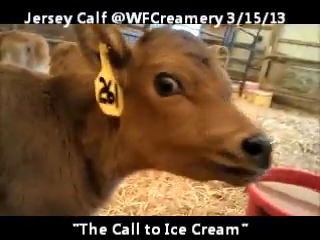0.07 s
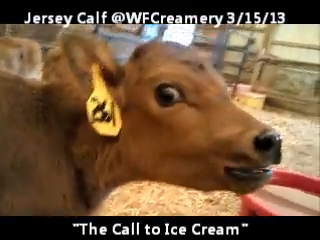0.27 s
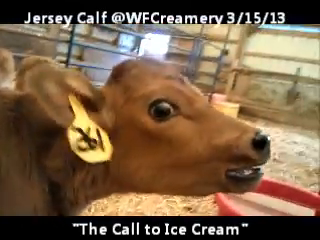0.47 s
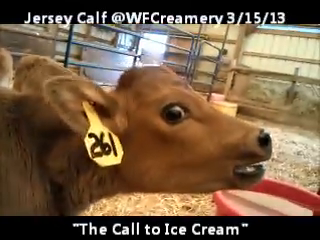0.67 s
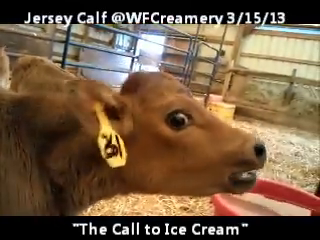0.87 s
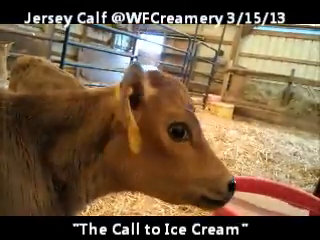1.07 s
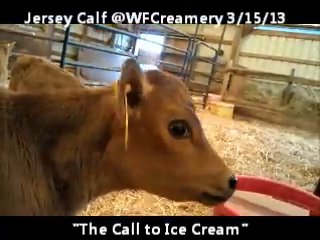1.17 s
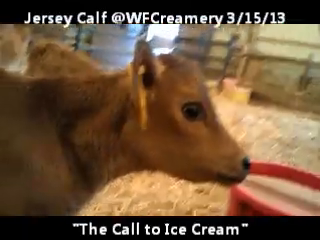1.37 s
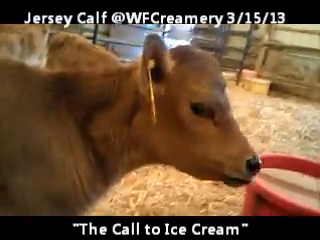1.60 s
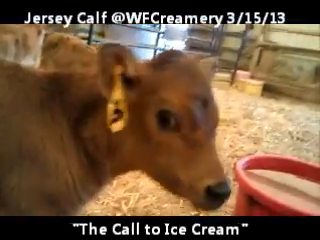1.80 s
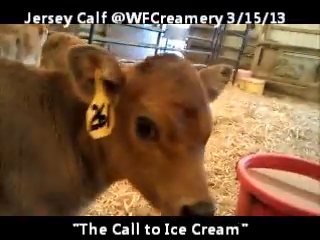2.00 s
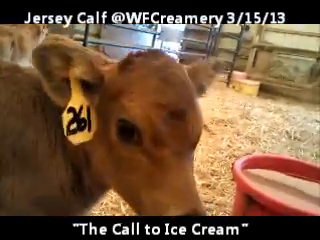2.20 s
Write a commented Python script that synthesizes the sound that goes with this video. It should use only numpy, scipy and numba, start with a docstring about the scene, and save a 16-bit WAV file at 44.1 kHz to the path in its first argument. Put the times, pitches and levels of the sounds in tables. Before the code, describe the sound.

A calf bawls once, very close to the microphone, starting as a rising nasal hum and opening into a loud, slightly distorted call. The barn echoes briefly, then the calf smacks its mouth and sniffs softly.

```python
"""Calf bawling in a barn

One calf, close to the microphone. Its vocal folds drive a rising hum through the nose, then the lips
part into a loud open call that overloads the microphone and sags at the end. The barn rings briefly.
Over quiet room tone the calf smacks its mouth, and sniffs and snuffles at the microphone in short puffs."""
import sys
import numpy as np
from scipy import signal
from scipy.fft import rfft, irfft
from scipy.io import wavfile
from scipy.ndimage import uniform_filter1d
from numba import njit

SR = 44100
rng = np.random.default_rng(int(sys.argv[2]) if len(sys.argv) > 2 else 0)


def dump_mix(stems):
    """Bounce the given channels to the path in sys.argv[1] as a 16-bit WAV at rate SR."""
    frames = np.atleast_2d(stems).T  # one column per channel
    limited = np.clip(frames, -1, 1)  # hard clip at full scale
    pcm = np.round(limited * 32767).astype(np.int16)
    wavfile.write(sys.argv[1], SR, pcm)


N = 99225
T = np.arange(N) / SR


def undb(db):
    """Decibels to gain."""
    return 10 ** (np.asarray(db) / 20)


def curve(rows):
    """Straight lines between (time [s], value) points."""
    return np.interp(T, *np.array(rows).T)


def fader(rows):
    """Gain from (time [s], level [dB]) points, silent outside them."""
    return undb(curve(rows)) * (T >= rows[0][0]) * (T < rows[-1][0])


def wander(rate_hz):
    """Smooth random drift with a spread near 1."""
    hold = int(SR / rate_hz)
    steps = np.repeat(rng.standard_normal(N // hold + 1), hold)
    return 1.5 * uniform_filter1d(uniform_filter1d(steps, hold), hold)[:N]


def spectrum(colour, size):
    """Gain of each FFT bin from (frequency [Hz], level [dB]) points."""
    hz, db = np.array(colour).T
    bins_hz = np.fft.rfftfreq(size, 1 / SR) + 1
    return undb(np.interp(np.log(bins_hz), np.log(hz), db))


def noise(colour):
    """Coloured noise of rms 1."""
    y = irfft(rfft(rng.standard_normal(N)) * spectrum(colour, N), N)
    return y / y.std()


@njit
def svf(x, hz, width):
    """State-variable filter with a moving centre: band-pass and low-pass."""
    y, band, low = np.empty((2, len(x))), 0., 0.
    for i in range(len(x)):
        g, damping = np.tan(np.pi * hz[i] / SR), width[i] / hz[i]
        v = (band + g * (x[i] + 1e-18 - low)) / (1 + g * (g + damping))
        y[0, i], y[1, i] = damping * v, low + g * v
        band, low = 2 * v - band, low + 2 * g * v
    return y


def ring(x, hz, width):
    """One resonance, gain 1 at its centre."""
    return svf(x, hz * np.ones(N), width * np.ones(N))[0]


def high_cut(x, hz):
    """Steep low-pass whose edge can move."""
    hz = hz * np.ones(N)
    return svf(svf(x, hz, 2 * hz)[1], hz, hz / np.sqrt(2))[1]


def low_cut(x, hz):
    """Two-pole high-pass."""
    return signal.sosfilt(signal.butter(2, hz, "highpass", fs=SR, output="sos"), x)


def cavity(x, colour, size=2048):
    """Causal, minimum-phase ringing of a cavity with the given colour."""
    cepstrum = irfft(np.log(spectrum(colour, size)))
    cepstrum[1:size // 2] *= 2
    cepstrum[size // 2 + 1:] = 0
    return signal.fftconvolve(x, irfft(np.exp(rfft(cepstrum))))[:N]


def vocal_folds(jitter=.00064, shimmer_db=.135, air_decay_cycles=.9):
    """Each cycle of the folds gives a sharp pulse and a fading puff of air."""
    # pitch of the folds (time [s], frequency [Hz])
    pitch = [(0, 128.5), (.06, 144.7), (.084, 150.1), (.142, 158.3), (.25, 170.6), (.33, 172.7),
             (.408, 175.9), (.516, 177.4), (.63, 177.7), (.72, 178.3), (.81, 178.8), (.9, 177.6),
             (.98, 175.8), (1.01, 171.2), (1.03, 164.1), (1.07, 134)]
    # unsteadiness: rough at first, clean when held, breaking at the end (time [s], factor [ratio])
    unsteadiness = [(0, 1.6), (.2, 3.1), (.35, 3.4), (.48, 1.63), (.65, 0.83), (.95, 1.5), (1.01, 2.42),
                    (1.05, 5.7)]
    rough = curve(unsteadiness)
    hz = curve(pitch) * (1 + jitter * rough * wander(118.8))
    cycles = np.cumsum(hz) / SR
    offset_samples = (cycles - np.round(cycles)) * SR / hz
    pulses = -np.sinc(offset_samples) * np.exp(-(offset_samples / 6) ** 2)
    pulses *= undb(shimmer_db * rough * wander(150))
    puffs = np.exp(-(cycles % 1) / air_decay_cycles)
    air = .2 * rough * noise([(100, -14), (700, -3), (4000, 0)]) * puffs
    return pulses, air


def nasal_hum(pulses, air, air_mix=.045, drive_db=20.5, press_s=(.18, .25)):
    """With the lips shut the folds ring the nose, first relaxed, then pressed."""
    # voice through the nose (time [s], level [dB])
    level = [(.009, -15), (.02, -12.5), (.06, -4), (.16, 0), (.23, -4), (.32, -1), (.345, 2), (.365, -6),
             (.4, -55)]
    # colour of the nose, relaxed and pressed (frequency [Hz], level [dB])
    relaxed = [(60, -43), (150, -7.5), (310, -13), (480, 0.5), (620, -10.5), (930, -1.5), (1100, -0.5),
               (1550, -14), (1780, -1.5), (2100, -23), (3300, -17.5), (3900, -27), (5050, -25.5),
               (5500, -7), (6050, -54), (6900, -12), (7250, -45), (7850, -18), (8700, -37), (15000, -52)]
    pressed = [(60, -11), (170, -0.5), (340, -13), (520, -7), (850, -15), (1030, -7), (1280, 3.5),
               (1680, -7.5), (2050, -15.5), (2900, -27), (3300, -14), (3700, -29), (4450, -16), (5300, -22),
               (6100, -29.5), (8000, -27), (10000, -23.5), (15000, -53)]
    # upper edge of the hum as it gathers force (time [s], cutoff [Hz])
    brightness = [(.01, 3200), (.06, 5200), (.11, 9000), (.15, 15900)]
    voice = (pulses + air_mix * air) * undb(drive_db) * fader(level)
    press = np.interp(T, press_s, [0, 1])
    hum = cavity(voice * (1 - press), relaxed) + cavity(voice * press, pressed)
    return high_cut(hum, curve(brightness))


def open_call(pulses, air, air_mix=.021, drive_db=35, radiation_hz=239):
    """The folds ring the throat and the mouth, whose resonances move with the jaw."""
    # voice through the mouth (time [s], level [dB])
    level = [(.315, -40), (.33, -13.5), (.342, -8), (.355, -10), (.385, -3), (.43, 5), (.51, 6), (.62, -1),
             (.82, -2), (.99, -3.5), (1.04, -7.5), (1.058, -16.5), (1.09, -72)]
    # all-pass spreading of each pulse along the throat (frequency [Hz], width [Hz])
    throat = [(1100, 926), (2200, 1320), (4000, 2040)]
    # mouth resonances (parted [Hz], open [Hz], closing [Hz], width [Hz],
    # parted [dB], open [dB], closing [dB])
    resonances = [(460, 534.3, 567.7, 57.3, -9, 4, 3), (682, 711, 719, 59, -17, -12, -11),
                  (850, 900, 900, 73, -12, -36, -14), (1040, 1060, 1090, 110, -14, -30, -12),
                  (1348, 1405, 1440, 34.7, 5, 0, 5.5), (1840, 1828, 1850, 95, 9.5, 2.5, 0.5),
                  (2220, 2531, 2563, 112, -11.5, -3, -8), (2460, 3000, 3050, 71, -3.5, -17, -11.5),
                  (3400, 4400, 4400, 56, -32, -24, -22.5), (4250, 4720, 5800, 230, -14, -19, -44),
                  (5170, 5480, 5770, 550, -25, -18.5, -21.5), (8000, 11500, 11500, 2600, -29, -28, -23)]
    # antiresonances of the side cavities (frequency [Hz], width [Hz], depth [0-1])
    notches = [(935, 125, 0.4), (3530, 750, 0.9), (6620, 1570, 0.84)]
    # upper edge: brighter as the jaw drops, mellower as effort fades (time [s], cutoff [Hz])
    brightness = [(.335, 2500), (.365, 5500), (.405, 10600), (.52, 10300), (.65, 8060), (.85, 6330),
                  (1.0, 5160), (1.06, 3540)]
    jaw_s = (.302, .431, 1.047)  # lips parted, wide open, closing
    voice = (pulses + air_mix * air) * undb(drive_db) * fader(level)
    for hz, width in throat:
        voice -= 2 * ring(voice, hz, width)
    call = np.zeros(N)
    for row in resonances:
        hz, width, db = np.interp(T, jaw_s, row[:3]), row[3], np.interp(T, jaw_s, row[4:])
        call += ring(voice, hz, width) * undb(db)
    for hz, width, depth in notches:
        call -= depth * ring(call, hz, width)
    return low_cut(high_cut(call, curve(brightness)), radiation_hz)


def tap(at, modes, peak_db):
    """One impulse into (frequency [Hz], width [Hz], level [dB]) resonances."""
    push = np.zeros(N)
    push[int(at * SR)] = 1
    y = sum(undb(db) * ring(push, hz, width) for hz, width, db in modes)
    return undb(peak_db) * y / abs(y).max()


def muzzle_bumps():
    """Soft bumps of lips and muzzle, each one damped resonance."""
    # bumps (time [s], resonance [Hz], width [Hz], relative level [dB])
    bumps = [(.342, 131, 161, -21), (1.8384, 377, 450, -29), (1.863, 540, 427, -16)]
    out = np.zeros(N)
    for at, hz, width, db in bumps:
        bump = tap(at, [(hz, width, 0)], db)
        out += 2 * low_cut(high_cut(bump, 3 * hz), hz / 2.4)
    return out


def sniffs():
    """Short fluttering puffs of air through the nostrils, right at the microphone."""
    # colour of the nostril air (frequency [Hz], level [dB])
    nostril = [(47, -68), (80, -34), (166, -26), (477, -3.5), (635, -10.5), (903, 2), (1010, -5),
               (1150, -2.5), (1790, -9), (2490, -10), (4320, -26), (5270, -22.5), (6280, -28), (10400, -21),
               (15500, -41)]
    # puffs (start [s], attack [s], hold [s], release [s], level [dB], treble [dB])
    puffs = [(1.474, 0.021, 0.0093, 0.041, -46.5, 6), (1.638, 0.019, 0.0084, 0.089, -50, -8),
             (1.711, 0.076, 0.082, 0.011, -34.5, 5), (1.924, .024, 0.0084, 0.039, -34, 5),
             (1.987, 0.025, 0.027, 0.019, -32, 4.5), (2.027, 0.021, 0.0092, 0.012, -30, 2),
             (2.066, .01, 0.029, 0.022, -46, 2), (2.11, 0.025, 0.0054, 0.027, -35, 3)]
    air = noise(nostril) * undb(1.3 * wander(250))
    treble = ring(air, 6200, 8100)
    out = np.zeros(N)
    for start, attack, hold, release, db, treble_db in puffs:
        swell = np.interp(T, start + np.cumsum([0, attack, hold, release]), [0, 1, 1, 0]) ** 1.41
        out += undb(db) * swell * (air + (undb(treble_db) - 1) * treble)
    return out


def mouth_smack(at_s=1.5213):
    """One wet click rings the mouth."""
    # resonances of the smack (frequency [Hz], width [Hz], relative level [dB])
    modes = [(821, 530, 7.5), (2537, 430, 8.5), (3410, 680, 2.5), (5570, 510, 5), (7370, 1100, -19.5),
             (10400, 2700, -25)]
    return high_cut(tap(at_s, modes, peak_db=-6.5), 9800)


def barn_echo(x, early_db=-20, early_t60_s=.1, tail_db=-21, mid_t60_s=.68, treble_t60_s=1, delay_s=.022):
    """Near reflections, then a diffuse tail whose treble outlasts its middle."""
    # colour of the echo (frequency [Hz], level [dB])
    colour = [(60, -14), (380, -2.5), (535, -11), (660, -1), (880, 1.5), (1400, -2), (2500, -2), (5000, -2),
              (15000, -9)]
    diffuse = noise(colour)
    mid = ring(diffuse, 990, 1900)
    tail = mid * undb(-60 * T / mid_t60_s) + (diffuse - mid) * undb(-60 * T / treble_t60_s)
    tail *= T > delay_s
    early = noise(colour) * undb(-60 * T / early_t60_s)
    echo = undb(tail_db) * tail / np.linalg.norm(tail) + undb(early_db) * early / np.linalg.norm(early)
    return signal.fftconvolve(x, echo)[:N]


def room_tone(level_db=-52.5):
    """The quiet air of the barn, wavering slightly."""
    # colour of the barn air (frequency [Hz], level [dB])
    colour = [(18, -55.5), (30, -5), (173, -0.5), (546, 1.5), (921, 5.5), (2070, -5), (2620, -15),
              (2990, -11), (4310, -15), (5040, -9), (15500, -11.5)]
    return undb(level_db + wander(11.8)) * noise(colour)


@njit
def follow(x, attack_s, release_s):
    """The limiter's envelope, with separate rise and fall times."""
    attack, release = 1 / (attack_s * SR), 1 / (release_s * SR)
    y, level = np.empty(len(x)), 0.
    for i in range(len(x)):
        level += (x[i] - level) * (attack if x[i] > level else release)
        y[i] = level
    return y


def scene():
    """The calf close up, with the barn's echo and room tone behind it, in mono."""
    pulses, air = vocal_folds()
    bawl = nasal_hum(pulses, air) + open_call(pulses, air)
    calf = bawl + muzzle_bumps() + sniffs() + mouth_smack()
    return (calf + barn_echo(calf) + room_tone())[None]


def record(dry):
    """The microphone overloads, a limiter ducks the loud call, and the top is cut."""
    overload, knee = .9, 6.
    threshold_db, ratio, top_hz = -9.5, 9, 15800
    oversampled = signal.resample_poly(dry[0], up=4, down=1)
    clipped = oversampled / (1 + abs(oversampled / overload) ** knee) ** (1 / knee)
    mic = signal.resample_poly(clipped, up=1, down=4)
    level = follow(abs(mic), attack_s=.0031, release_s=.97)
    limited = mic / np.maximum(level / undb(threshold_db), 1) ** (1 - 1 / ratio)
    return signal.sosfilt(signal.ellip(10, .2, 80, top_hz, fs=SR, output="sos"), limited)[None]


dry = scene()
out = record(dry)
dump_mix(out)
```